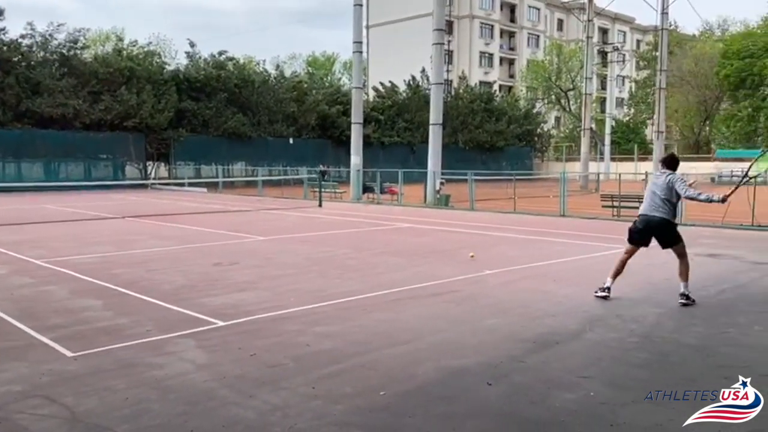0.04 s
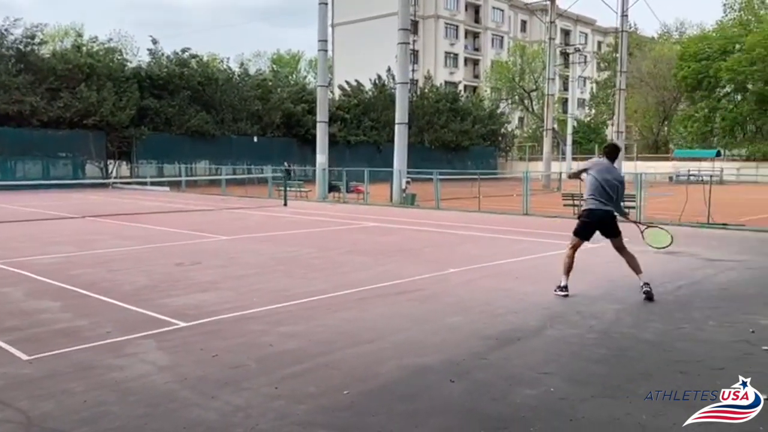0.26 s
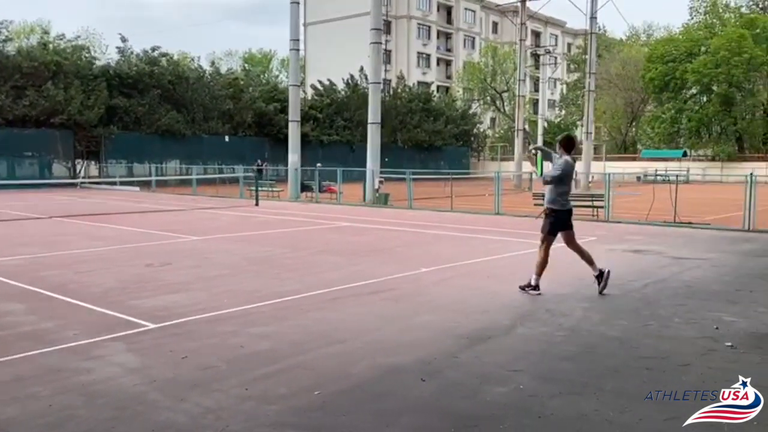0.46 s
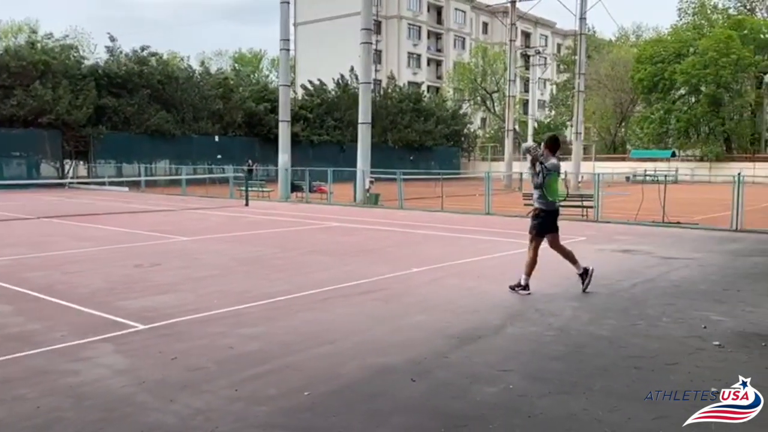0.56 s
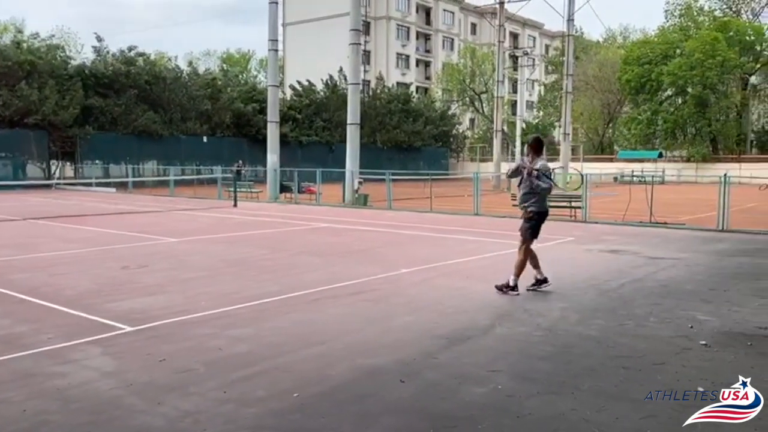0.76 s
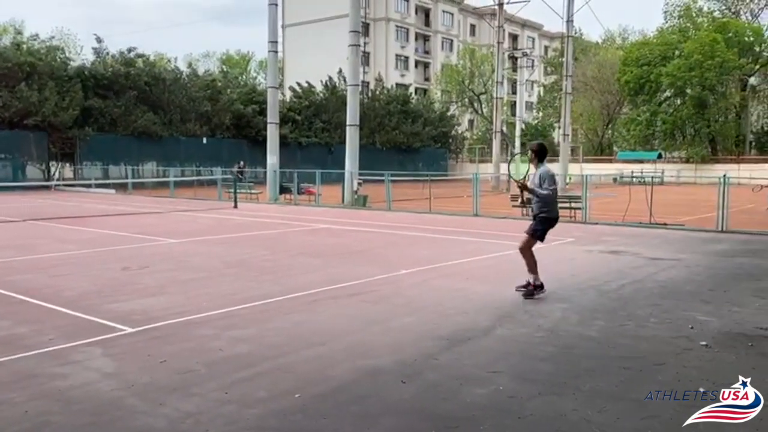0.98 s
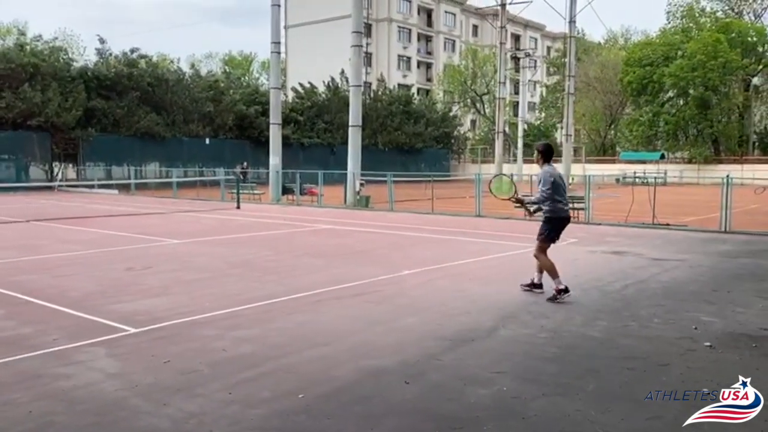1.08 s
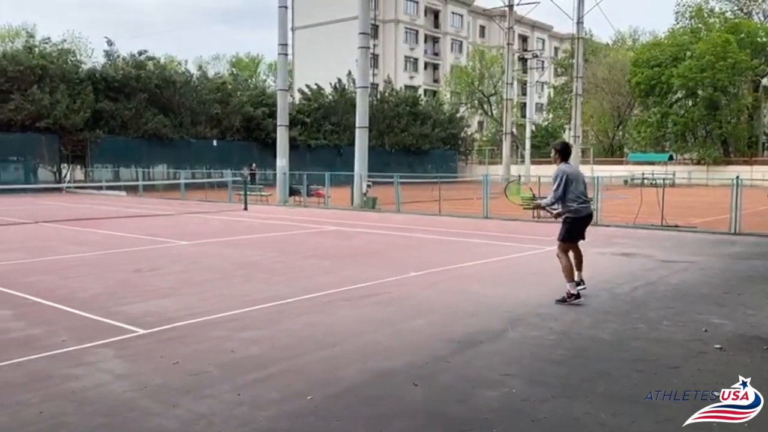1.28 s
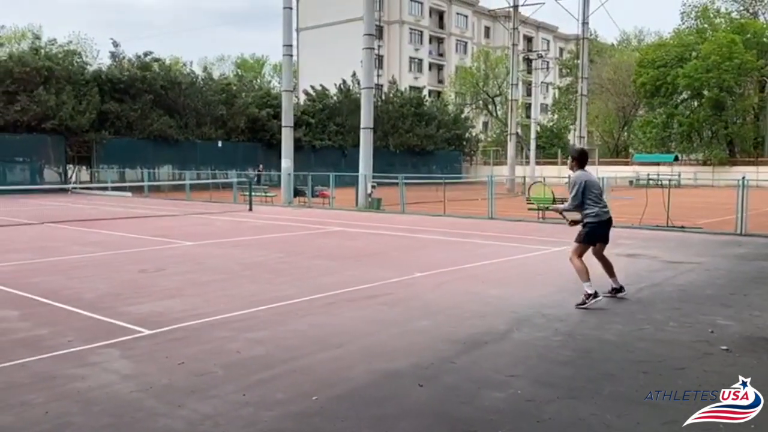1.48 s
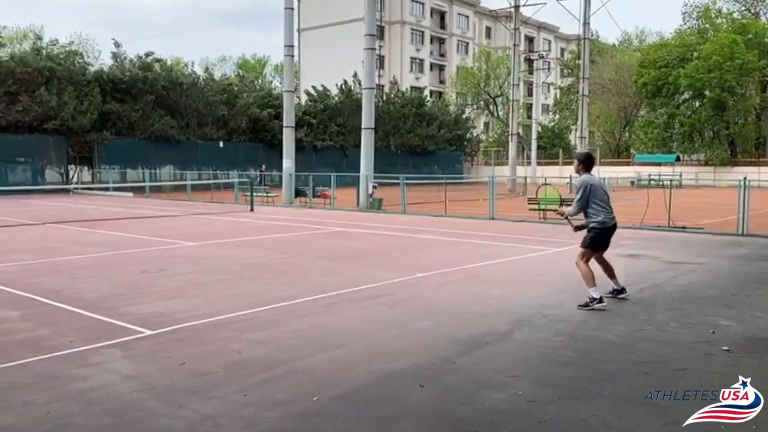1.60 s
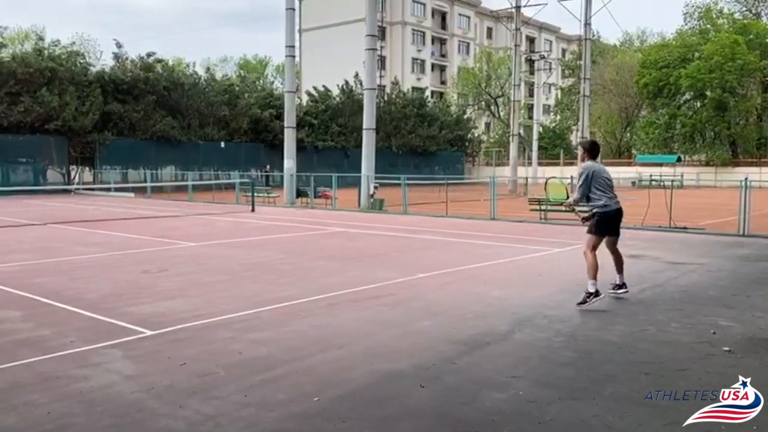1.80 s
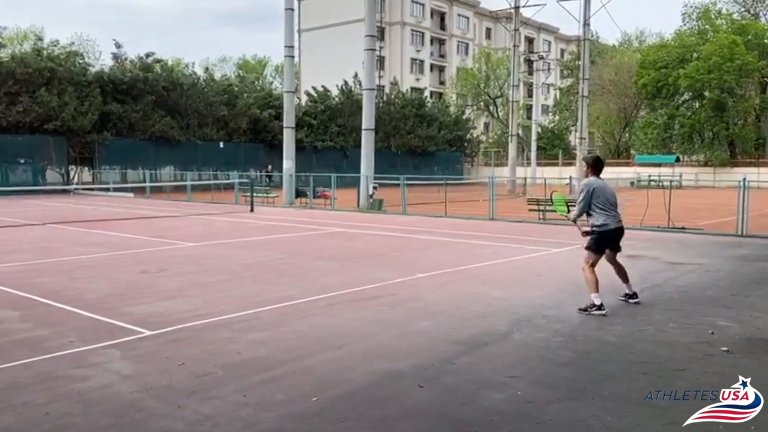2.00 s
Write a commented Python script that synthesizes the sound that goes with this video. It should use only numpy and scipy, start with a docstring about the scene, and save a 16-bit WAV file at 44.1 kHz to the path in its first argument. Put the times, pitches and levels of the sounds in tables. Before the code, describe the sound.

One loud tennis stroke rings across an outdoor hard court, picked up by a small stereo microphone. Light shuffling steps, a faint distant knock and a hollow ball bounce follow, over a low city rumble.

```python
"""An outdoor hard court during a tennis rally, heard on a small stereo microphone behind the baseline.
The hollow ball pops on the ground and the player cracks a forehand, ringing ball and strings.
His shoes scuff and tap on the gritty surface, and a ball bounces again; a pock and a dull knock
come from farther off. Fences and a block of flats throw the blows back over a low city rumble."""
import sys
import numpy as np
from scipy import signal
from scipy.fft import rfft, irfft, next_fast_len
from scipy.io import wavfile
from scipy.ndimage import uniform_filter1d

SR = 44100
rng = np.random.default_rng(int(sys.argv[2]) if len(sys.argv) > 2 else 0)


def unload_wav(signal):
    """Save mono or channel-first audio to the path in sys.argv[1] as 16-bit WAV at rate SR, clipped to [-1, 1]."""
    wavfile.write(
        sys.argv[1],
        SR,
        np.round(np.clip(np.atleast_2d(signal).T, -1, 1) * 32767).astype(np.int16),
    )


N = 90404

# the forehand: start_s, level_db
STROKES = [(0.3228, -6)]
# strings, frame and ball ringing: pitch_hz, level_db, t60_s, onset_s, pan_left_db
RACKET_MODES = [(128.3, -18, 0.085, 0.0026, 1.5), (223, -5, 0.024, 0.0055, 1.5),
                (321, -1.5, 0.027, 0.0023, -0.5), (449, -17, 0.07, 0.00292, 7.5),
                (850, -8, .034, 0.0032, -6), (1095, -3.5, .024, 0.003126, -4),
                (1444, -10.5, 0.022, 0.00255, -8), (1600, -11, 0.013, 0.00208, 0),
                (2170, -10.5, 0.019, 0.001666, -2), (2302, -15, 0.033, 0.00109, -1),
                (3404, -18.5, 0.03, 0.00095, -6), (3995, -18, 0.015, 0.000492, -5),
                (4170, -20, 0.017, 0.000992, -6), (5780, -24, 0.016, .002, 0),
                (838, -39, 0.75, 0.00301, -1), (1098, -39.5, 0.43, 0.00298, -3)]
# the crack of first contact: freq_hz, density_db
CRACK_SPECTRUM = [(300, -6), (1000, -2), (2400, 0.5), (3100, -2.5), (4200, 1), (5100, -17), (5800, -19),
                  (7000, -11.5), (11000, -15.5)]
# what the stroke throws sideways to the fences: freq_hz, density_db
STROKE_SPRAY = [(60, -10.5), (190, 7), (400, 6), (580, -1), (900, 2.5), (1300, -3.5), (2200, -10),
                (4000, -18), (5500, -20.5), (11000, -22)]
# hard reflections of the stroke: delay_s, level_db, low_hz, high_hz
SLAPBACKS = [(0.068, -21, 250, 2600), (0.176, -28.5, 1200, 2600)]
CRACK_DB, STROKE_SPRAY_DB, STROKE_COURT_DB = -21, 3.5, -21.5

def racket():
    """The strings crack against the felt, then ball and strings ring; the fences scatter and echo it."""
    direct, spray, echoes = np.zeros((2, N)), np.zeros(N), np.zeros(N)
    for start_s, level_db in STROKES:
        for *mode, pan_db in RACKET_MODES:
            add(direct, start_s, amp(level_db) * pan(pan_db) * ring([mode], rise_s=0.00094))
        crack = burst(CRACK_SPECTRUM, rise_s=0.0007, hold_s=0.0029, fall_s=0.0014)
        add(direct, start_s, amp(CRACK_DB) * crack)
        add(spray, start_s, amp(STROKE_SPRAY_DB) * pulse(STROKE_SPRAY))
    mono = direct.mean(0)
    for delay_s, level_db, low_hz, high_hz in SLAPBACKS:
        add(echoes, delay_s, amp(level_db) * butterworth(mono, [low_hz, high_hz], "band"))
    return arrive(direct, left_lead_s=-0.000095) + echoes + court(amp(STROKE_COURT_DB) * mono + spray)

# the ball landing:
# start_s, pop_db, grit_db, pan_left_db, left_lead_s, court_db, low_cut_hz, pitch_ratio
BOUNCES = [(0.1994, -17.5, -45.5, 1.5, 0, -7.5, 200, 1), (1.8234, -11, -33.5, 2, .0002, -2.5, 188, 1),
           (2.035, -28, -55.5, -1, -.0002, -17, 230, 1.04)]
# the hollow ball: pitch_hz, level_db, t60_s, onset_s
BALL_MODES = [(269, -3, 0.02, 0.0006), (374, -0.5, 0.012, 0.0005), (577, -5, 0.021, 0.001),
              (700, -11.5, 0.0185, 0.0003), (847, -4.5, 0.022, 0.0007), (1026, -6, 0.013, 0.0001),
              (1420, -17, 0.04, 0.0007), (1600, -25, .04, .0006), (2020, -29, 0.034, 0.0007),
              (2455, -29.5, .06, 0)]
# felt brushing grit: freq_hz, density_db
GRIT_SPECTRUM = [(300, 12.5), (1500, 3.5), (2200, -15), (3000, -15), (7000, -12.5), (10000, -6),
                 (12000, -17)]
# what a bounce throws out to the fences: freq_hz, density_db
BOUNCE_SPRAY = [(100, -16), (250, 5.5), (450, 4), (900, -1.5), (1200, -8), (1600, -10), (2200, -21),
                (10000, -34)]
BALL_RISE_S, GRIT_LEAD_S = 0.00061, 0.0018

def bounces():
    """The felt brushes the grit, then the hollow ball pops; it is too small to radiate bass."""
    out = np.zeros((2, N))
    for start_s, pop_db, grit_db, pan_db, left_lead_s, court_db, low_cut_hz, pitch_ratio in BOUNCES:
        direct, spray = np.zeros((2, N))
        pop = ring(BALL_MODES, BALL_RISE_S, pitch_ratio)
        add(direct, start_s, amp(pop_db) * butterworth(pop, low_cut_hz, "high"))
        grit = burst(GRIT_SPECTRUM, BALL_RISE_S, hold_s=GRIT_LEAD_S, fall_s=0.0077)
        add(direct, start_s - GRIT_LEAD_S, amp(grit_db) * grit)
        add(spray, start_s, amp(court_db) * pulse(BOUNCE_SPRAY))
        out += pan(pan_db) * arrive(direct, left_lead_s) + court(spray)
    return out

# the player's footfalls: start_s, thud_db, slap_db, click_db, pitch_ratio
FOOTFALLS = [(0.083, -34.5, -31.5, -35, 0.96), (0.393, -37, -43, -54, 1.1), (0.94, -41.5, -46, -58, 1),
             (1.216, -46, -45, -55, 0.86), (1.327, -40, -55, -66, 1), (1.583, -38.5, -42, -46, 1.54),
             (1.903, -52, -38, -42, 1.33)]
# sole and leg: pitch_hz, level_db, t60_s, onset_s
SHOE_MODES = [(185, -1, 0.048, .004), (286, 0, 0.027, 0.0017), (455, -15, 0.012, 0.002),
              (1210, -24, 0.005, 0)]
# the body's weight landing: pitch_hz, level_db, t60_s, onset_s
THUD_MODES = [(69.6, -1.7, 0.13, 0.006), (116.7, 0, 0.075, 0.0046)]
# the click of the sole touching down: freq_hz, density_db
CLICK_SPECTRUM = [(650, -4), (1180, 12), (1700, 5), (5000, -11.5), (11000, -23)]
SHOE_RISE_S, STEP_COURT_DB = 0.00013, -13

def footsteps():
    """A sole clicks and slaps down, and the weight follows with a thud."""
    out = np.zeros(N)
    for start_s, thud_db, slap_db, click_db, pitch_ratio in FOOTFALLS:
        click = burst(CLICK_SPECTRUM, SHOE_RISE_S, hold_s=SHOE_RISE_S, fall_s=0.0045)
        add(out, start_s, amp(click_db) * click)
        add(out, start_s, amp(slap_db) * ring(SHOE_MODES, SHOE_RISE_S, pitch_ratio))
        add(out, start_s, amp(thud_db) * ring(THUD_MODES, rise_s=0.013))
    return out + amp(STEP_COURT_DB) * court(out)

# soles sliding: start_s, hold_s, level_db, tilt_db_per_octave, rise_s, fall_s
SCUFFS = [(0.038, 0.042, -42, 5, 0.0045, 0.0083), (0.215, 0.097, -62.5, 2.5, 0.0081, 0.023),
          (0.296, 0.02, -50.5, 0, 0.011, 0.008), (0.543, 0.081, -59.5, 4, 0.02, 0.025),
          (0.601, 0.041, -55.5, 3, 0.025, 0.016), (0.7652, 0.057, -43, 0.4, 0.0018, 0.019),
          (1.044, 0.044, -52, 5, 0.014, 0.019), (1.381, 0.027, -51.5, 2, 0.015, 0.021),
          (1.421, 0.037, -54, 4.5, 0.0083, 0.069), (1.481, 0.023, -49, 0, 0.0031, 0.023),
          (1.652, 0.06, -60, 3.5, 0.017, 0.058), (1.833, 0.038, -55, -2, 0.0064, 0.019),
          (1.898, 0.045, -52, 0, 0.0058, 0.02)]
# a sole scraping on grit: freq_hz, density_db
SCRAPE_SPECTRUM = [(200, -7.5), (900, -5.5), (2000, 1.5), (3200, -1), (4600, -2.5), (6100, -6.5),
                   (7000, -6.5), (10000, -5), (12000, -8.5)]
# the rubber tread, chirping while the shoe is fast: pitch_hz, level_db
TREAD_MODES = [(4550, -3), (5210, 0), (6020, 2.5)]
GRAINS_PER_S, GRAIN_SPREAD_DB, TREAD_WIDTH_HZ = 6000, 2, 100
SLOW_TILT_DB_PER_OCTAVE, SCUFF_COURT_DB = -2, -12.5

def scuffs():
    """Grains of grit tick under a sliding sole and ring its tread; the scrape darkens as the shoe slows."""
    out, size = np.zeros(N), SR // 2
    t = np.arange(size) / SR
    for start_s, hold_s, level_db, tilt, rise_s, fall_s in SCUFFS:
        ticks = (rng.random(size) < GRAINS_PER_S / SR) * rng.choice([-1, 1], size)
        grains = ticks * amp(GRAIN_SPREAD_DB * rng.exponential(1, size))
        tread = sum(amp(db) * signal.lfilter(*signal.iirpeak(hz, hz / TREAD_WIDTH_HZ, SR), grains)
                    for hz, db in TREAD_MODES)
        fast = coloured(grains + tread, SCRAPE_SPECTRUM, tilt)
        slow = coloured(grains, SCRAPE_SPECTRUM, tilt + SLOW_TILT_DB_PER_OCTAVE)
        slowed = np.minimum(t / (hold_s + fall_s), 1) ** 2
        scrape = (1 - slowed) * fast + slowed * slow
        add(out, start_s, amp(level_db) * scrape * envelope(size, rise_s, hold_s, fall_s))
    return out + amp(SCUFF_COURT_DB) * court(out)

# a ball some way off: pitch_hz, level_db, t60_s, onset_s
FAR_BALL_MODES = [(460, -1.5, 0.025, 0.001), (910, -1.5, 0.044, 0.0016), (1270, -7, 0.022, 0.00076)]

def far_tap(start_s=0.6068, level_db=-30.5, pan_db=-2.5, court_db=-14):
    """A tapped ball rings with a small hollow pock, a little right of the microphone."""
    out = np.zeros(N)
    add(out, start_s, amp(level_db) * ring(FAR_BALL_MODES, rise_s=0.0015))
    return pan(pan_db) * out + amp(court_db) * court(out)

# a blow from across the court: start_s, level_db, fall_s, pan_left_db, court_db
FAR_KNOCKS = [(1.03, -52.5, 0.08, -3, 5.5)]
# its dull tone at that distance: freq_hz, density_db
KNOCK_SPECTRUM = [(150, -25), (450, -1), (900, 1), (1600, -11), (6000, -40)]

def far_knock():
    """A far blow arrives from the right, dull and smeared, mostly echo."""
    out = np.zeros((2, N))
    for start_s, level_db, fall_s, pan_db, court_db in FAR_KNOCKS:
        knock = np.zeros((2, N))
        shape = envelope(N, rise_s=0.0034, hold_s=0.0068, fall_s=fall_s)
        add(knock, start_s, amp(level_db) * coloured(diffuse(N), KNOCK_SPECTRUM) * shape)
        out += pan(pan_db) * (knock + amp(court_db) * court(knock.mean(0)))
    return out

# how long the court rings: freq_hz, t60_s
COURT_DECAY = [(100, 1.5), (1000, 1.84), (2000, 1.0), (4000, 1.04), (10000, 0.56)]
# the tone of its tail: freq_hz, gain_db
COURT_COLOUR = [(60, -3), (180, -3.5), (400, -2.5), (1000, 0), (2000, 5), (4000, 2.5), (7000, 0.5),
                (11000, -0.5)]
# echoes off the walls: delay_s, level_db, smear_s
WALL_ECHOES = [(0.046, -9.5, 0.01), (0.08, -13, 0.024)]
FENCE_DB, FENCE_T60_S, WALL_CUTOFF_HZ = 7, 0.096, 1170
NOTCH_HZ, NOTCH_SINK_S, NOTCH_WIDTH_HZ, NOTCH_DB = 1963, 0.47, 99, -7

def court(sound):
    """What comes back to the microphone: quick scatter off fences, a long tail and dull wall echoes."""
    size = next_fast_len(SR * 5 // 4)
    hz, t, bands = signal.stft(diffuse(size), SR, nperseg=256)
    fade = decay(t, curve(COURT_DECAY, hz)[:, None]) + amp(FENCE_DB) * decay(t, FENCE_T60_S)
    tail = signal.istft(bands * fade, SR, nperseg=256)[1][:, :size]
    # scattered paths cancel in a band that sinks as the tail travels
    hz, t, bands = signal.stft(tail, SR, nperseg=1024)
    centre_hz = NOTCH_HZ * np.exp(-t / NOTCH_SINK_S)
    notch = np.exp(-((hz[:, None] - centre_hz) / NOTCH_WIDTH_HZ) ** 2)
    tail = signal.istft(bands * amp(NOTCH_DB * notch), SR, nperseg=1024)[1][:, :size]
    tail /= np.linalg.norm(tail[0])
    colour = amp(curve(COURT_COLOUR, np.fft.rfftfreq(2 * size, 1 / SR)))
    tail = irfft(rfft(tail, 2 * size) * colour)[:, :size]
    for delay_s, level_db, smear_s in WALL_ECHOES:
        echo = diffuse(size) * envelope(size, smear_s / 2, smear_s / 2, smear_s)
        echo /= np.linalg.norm(echo[0])
        add(tail, delay_s, amp(level_db) * butterworth(echo, WALL_CUTOFF_HZ, "low"))
    return signal.fftconvolve(sound[None], tail, axes=1)[:, :N]

# distant traffic and leaves: freq_hz, density_db
CITY_SPECTRUM = [(20, -32), (50, -2), (90, -1), (150, -4), (300, -11), (900, -12), (1500, -16.5),
                 (3400, -30), (7000, -40), (11000, -52)]

def city(level_db=-52.5, waver_db=1.5):
    """The city rumbles beyond the fences, gently uneven in tone and level."""
    bands = signal.stft(diffuse(N), nperseg=1024)[2]
    patches = uniform_filter1d(rng.standard_normal(bands.shape[1:]), size=8, axis=0)  # across frequency
    patches = unit_rms(uniform_filter1d(patches, size=6, axis=1))  # across time
    uneven = signal.istft(bands * amp(waver_db * patches))[1][:, :N]
    return amp(level_db) * coloured(uneven, CITY_SPECTRUM)

# left-right likeness of scattered sound at the microphone: freq_hz, coherence
DIFFUSE_COHERENCE = [(60, 0.94), (130, 0.99), (270, 0.75), (570, -0.041), (1210, -0.47), (2300, 0.58),
                     (5500, 0.075), (11000, 1)]

def diffuse(size):
    """Two channels of noise arriving from all around."""
    mid, side = rfft(rng.standard_normal((2, size)))
    coherence = np.clip(curve(DIFFUSE_COHERENCE, np.fft.rfftfreq(size, 1 / SR)), -1, 1)
    mid *= np.sqrt((1 + coherence) / 2)
    side *= np.sqrt((1 - coherence) / 2)
    return irfft(np.array([mid + side, mid - side]), size)

def ring(modes, rise_s, pitch_ratio=1):
    """Modes that swell while the contact lasts and then die."""
    t = np.arange(SR * 3 // 4) / SR
    out = np.zeros(len(t))
    for pitch_hz, level_db, t60_s, onset_s in modes:
        age = np.maximum(t - onset_s, 0)
        swell = 1 - np.exp(-(age / rise_s) ** 2)
        out += amp(level_db) * swell * decay(age, t60_s) * np.sin(2 * np.pi * pitch_hz * pitch_ratio * age)
    return out

def burst(spectrum, rise_s, hold_s, fall_s):
    """A short rush of tiny contacts."""
    size = SR // 8
    return coloured(rng.choice([-1., 1.], size), spectrum) * envelope(size, rise_s, hold_s, fall_s)

def pulse(spectrum, centre_s=0.003):
    """One smooth click of energy 1."""
    hz = np.fft.rfftfreq(SR // 8, 1 / SR)
    click = irfft(amp(curve(spectrum, hz)) * np.exp(-2j * np.pi * hz * centre_s))[:len(hz)]
    return click / np.linalg.norm(click)

def arrive(sound, left_lead_s, aligned_above_hz=1900):
    """A blow reaches one microphone port ahead of the other; the treble stays aligned."""
    hz = np.fft.rfftfreq(sound.shape[-1], 1 / SR)
    phase = np.pi * hz * left_lead_s / (1 + (hz / aligned_above_hz) ** 4)
    return irfft(rfft(sound) * np.exp(1j * np.array([phase, -phase])), sound.shape[-1])

def coloured(noise, spectrum, tilt_db_per_octave=0):
    """Gives noise a spectrum and a tilt, at rms 1."""
    hz = np.fft.rfftfreq(noise.shape[-1], 1 / SR)
    gain_db = curve(spectrum, hz) + tilt_db_per_octave * np.log2(np.maximum(hz, hz[1]))
    return unit_rms(irfft(rfft(noise) * amp(gain_db), noise.shape[-1]))

def envelope(size, rise_s, hold_s, fall_s):
    """Linear rise, then an exponential fall from hold_s on."""
    t = np.arange(size) / SR
    return np.minimum(t / rise_s, 1) * np.exp(-np.maximum(t - hold_s, 0) / fall_s)

def decay(t, t60_s):
    """Falls 60 dB every t60_s."""
    return np.exp(-np.log(1000) * t / t60_s)

def butterworth(sound, edge_hz, kind):
    """Filters with slopes of 12 dB per octave."""
    return signal.sosfilt(signal.butter(2, edge_hz, kind, fs=SR, output="sos"), sound)

def curve(points, hz):
    """Reads a table on a log-frequency axis."""
    freq_hz, value = np.transpose(points)
    return np.interp(np.log(hz + 1), np.log(freq_hz + 1), value)

def add(mix, start_s, sound):
    """Mixes a sound in at start_s."""
    part = mix[..., max(round(start_s * SR), 0):][..., :sound.shape[-1]]
    part += sound[..., :part.shape[-1]]

def pan(left_db):
    """Left and right gains for a level difference."""
    return amp(np.array([[left_db], [-left_db]]) / 2)

def amp(db):
    """Decibels to gain."""
    return 10 ** (np.asarray(db) / 20)

def unit_rms(x):
    """Scales to rms 1."""
    return x / np.sqrt(np.mean(x ** 2) + 1e-20)

def scene():
    """Everything on and around the court, from behind the baseline."""
    return racket() + bounces() + far_tap() + far_knock() + scuffs() + footsteps() + city()

# the microphone's response: freq_hz, gain_db
MIC_RESPONSE = [(20, 1), (7300, 0.5), (8300, 2.5), (9300, 0), (11000, -2.5), (12000, -12)]
# level between its two ports: freq_hz, left_minus_right_db
MIC_BALANCE = [(100, -.3), (600, -2), (1200, -2), (2100, -.5), (3600, 2.5), (6400, 4.5), (9000, 1)]
# phase between its two ports: freq_hz, left_lead_rad
MIC_PHASE = [(20, 0), (7000, 0), (7900, -3.1), (8850, -3.2), (9400, -6.3), (11000, -6.3), (11500, -9.4)]
BAND_LIMIT_HZ = 11900

def record(dry):
    """Two small microphone ports with their own colour and phase, then the band limit."""
    hz = np.fft.rfftfreq(2 * N, 1 / SR)
    side = np.array([[0.5], [-0.5]])
    gain = amp(curve(MIC_RESPONSE, hz) + side * curve(MIC_BALANCE, hz))
    phase = side * curve(MIC_PHASE, hz)
    heard = irfft(rfft(dry, 2 * N) * gain * np.exp(1j * phase))[:, :N]
    lowpass = signal.firwin(301, BAND_LIMIT_HZ, window=("kaiser", 9), fs=SR)
    return signal.oaconvolve(heard, lowpass[None], "same")

dry = scene()
out = record(dry)
unload_wav(out)
```